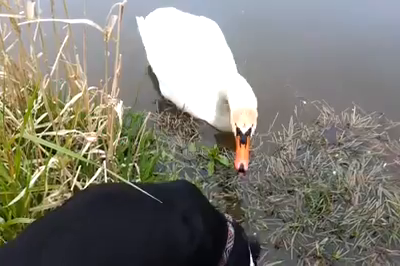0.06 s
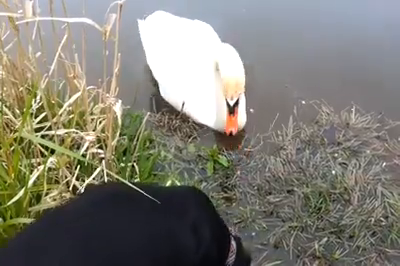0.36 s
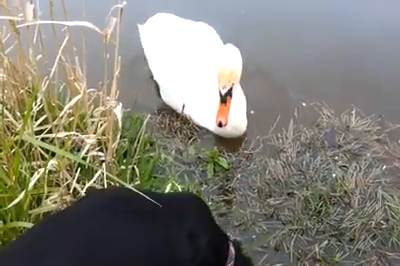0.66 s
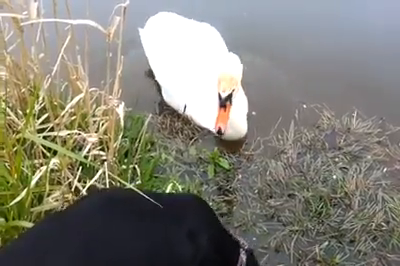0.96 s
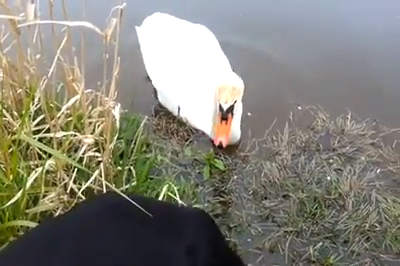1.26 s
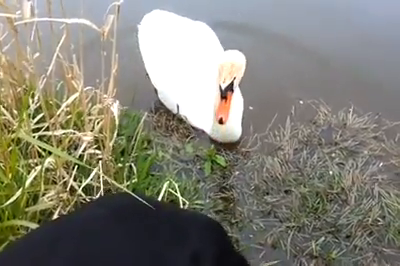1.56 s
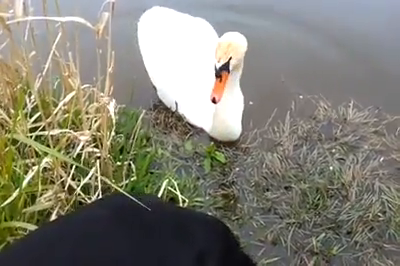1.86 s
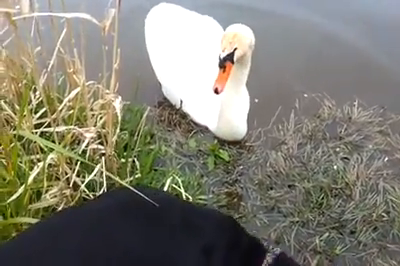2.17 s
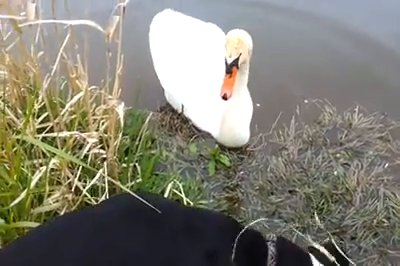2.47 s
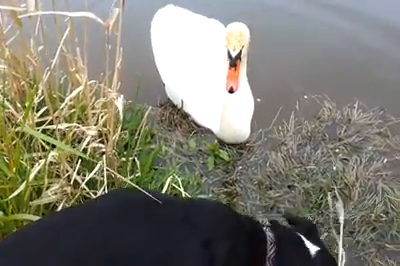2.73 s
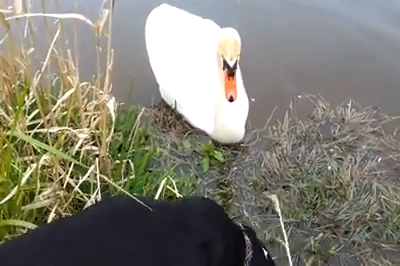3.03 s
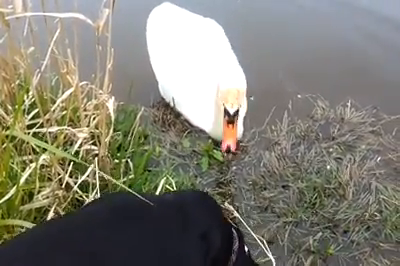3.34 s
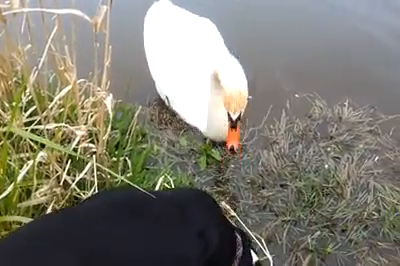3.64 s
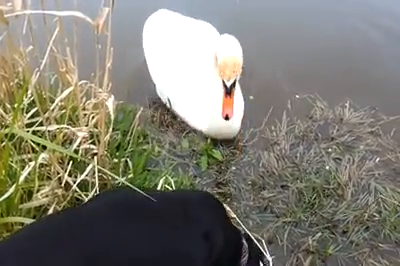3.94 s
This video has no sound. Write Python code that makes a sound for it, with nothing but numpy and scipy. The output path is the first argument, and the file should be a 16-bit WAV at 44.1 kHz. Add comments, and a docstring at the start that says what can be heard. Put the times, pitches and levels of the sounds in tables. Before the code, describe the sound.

A swan hisses for the first second, a breathy, fluttering rush with a faint hum, fading into a sputter. From about 1 to 2.3 seconds reeds rustle, dry stems tick and shallow water sloshes and plops, with a soft paw thud near 1.2 seconds. A few sparse ticks and plops follow over quiet open air. At about 3.6 seconds a second, softer hiss begins and lasts to the end.

```python
"""A pond's edge, heard from the bank through one small microphone. Out on the water a swan hisses twice
at a dog: air rushes through its throat and open bill, fluttering, while its long windpipe hums faintly
and the water mirrors the sound as the head moves. Between the hisses the reeds rustle, dry stems tick,
a paw falls softly and the shallows slosh and plop. Quiet open air lies under it all."""
import sys
import numpy as np
from scipy import signal
from scipy.fft import rfft, irfft, next_fast_len
from scipy.io import wavfile
from scipy.ndimage import uniform_filter1d, map_coordinates

SR = 44100
rng = np.random.default_rng(int(sys.argv[2]) if len(sys.argv) > 2 else 0)


def generate_wav(signal):
    """Clip the signal to [-1, 1] and save it as 16-bit WAV at the path in sys.argv[1]."""
    frames = np.transpose(np.atleast_2d(signal))
    scaled = np.clip(frames, -1, 1) * 32767
    pcm = np.round(scaled).astype(np.int16)
    wavfile.write(sys.argv[1], SR, pcm)


N = 176400


def amp(db):
    """Decibels to gain."""
    return 10 ** (np.asarray(db) / 20)


def unit(x):
    """Scale to rms 1."""
    return x / np.sqrt(np.mean(x ** 2) + 1e-20)


def along(points, hz):
    """Read (frequency, value) points at hz, on a log axis."""
    freqs, values = np.transpose(points)
    return np.interp(np.log(hz + 1), np.log(freqs + 1), values)


def curves(rows, t=np.arange(N) / SR):
    """Each column after the time, read at times t."""
    times, *columns = np.transpose(rows)
    return [np.interp(t, times, column) for column in columns]


def wobble(rate):
    """A smooth random curve, rate knots a second."""
    return map_coordinates(rng.standard_normal(int(N * rate / SR) + 4), [np.arange(N) * rate / SR])


def phase_of(hz):
    """Running phase of a changing frequency."""
    return 2 * np.pi * np.cumsum(hz) / SR


def filtered(x, response):
    """Shape x by a gain that depends on frequency."""
    size = next_fast_len(N + SR // 2)
    return irfft(rfft(x, size) * response(np.fft.rfftfreq(size, 1 / SR)), size)[:N]


def coloured(x, spectrum):
    """Shape x by (frequency, level) points, rms 1."""
    return unit(filtered(x, lambda hz: amp(along(spectrum, hz))))


def rush(spectrum):
    """Coloured noise, rms 1."""
    return coloured(rng.standard_normal(N), spectrum)


def grains(spectrum, per_s, spread_db, share):
    """Tiny random impacts on a bed of noise, rms 1."""
    hits = (rng.random(N) < per_s / SR) * rng.choice([-1, 1], N)
    strength = amp(spread_db * np.clip(rng.standard_normal(N), -2, 2))
    return unit(share * coloured(hits * strength, spectrum) + rush(spectrum))


def swells(rows):
    """Envelope of rounded swells, each with its own rise and fall."""
    power, t = np.zeros(N), np.arange(N) / SR
    for peak_s, rise_s, fall_s, db in rows:
        width_s = np.where(t < peak_s, rise_s, fall_s)
        power += (amp(db) * np.exp(-((t - peak_s) / width_s) ** 2)) ** 2
    return np.sqrt(power)


def add(track, start_s, sound):
    """Mix a short sound into the track."""
    part = track[round(start_s * SR):][:len(sound)]
    part += sound[:len(part)]


# Open air all around the microphone: freq_hz, level_db
AMBIENCE_SPECTRUM = [(20, -13), (210, -3), (651, -12.5), (950, -14), (6140, -18.5), (7080, -20),
                     (9200, -32)]

def pond_air(level_db=-54.5):
    """A low, quiet wash whose level drifts slightly."""
    return amp(level_db + 0.912 * wobble(7.598)) * rush(AMBIENCE_SPECTRUM)


# Swell of a wavelet in the weeds: peak_s, rise_s, fall_s, level_db
WAVELET_SWELL = [(1.9, .1, .14, -57.5)]
# Its falling gurgle: time_s, pitch_hz
GURGLE_PITCH = [(1.82, 900), (1.98, 520)]

def wavelet(width_hz=520):
    """A soft band of bubbling that sinks in pitch as the water drains back."""
    phase = phase_of(curves(GURGLE_PITCH)[0])
    bubbling = wobble(width_hz) * np.cos(phase) + wobble(width_hz) * np.sin(phase)
    return swells(WAVELET_SWELL) * unit(bubbling)


# Sloshes along the bank: peak_s, rise_s, fall_s, level_db
SLOSH_SWELLS = [(1.009, 0.0174, 0.00564, -41.5), (1.15, 0.0665, 0.056, -51), (1.212, 0.0363, 0.0216, -40.5),
                (1.29, 0.08, 0.137, -49.5), (1.9, 0.224, 0.35, -54), (3.05, 0.0275, 0.119, -62.5)]
# Colour of splashing water: freq_hz, level_db
WATER_SPECTRUM = [(50, -3.5), (120, -8.5), (300, 1), (550, -0.5), (1100, -2), (1700, -11), (3000, -30.5)]

def shallows():
    """Shallow water, pushed about, sloshes in grainy swells."""
    return swells(SLOSH_SWELLS) * grains(WATER_SPECTRUM, per_s=220, spread_db=2.5, share=1.12)


def paw_fall(peak_s=1.21, width_s=.018, level_db=-48, corner_hz=130):
    """One soft, low thud of a paw on the bank."""
    thud = unit(filtered(rng.standard_normal(N), lambda hz: hz / (1 + (hz / corner_hz) ** 4)))
    return swells([(peak_s, width_s, width_s, level_db)]) * thud


# Strokes through the reed bed: peak_s, rise_s, fall_s, level_db
REED_STROKES = [(1.245, 0.1125, 0.086, -46), (1.36, 0.0506, 0.06, -47), (1.65, 0.0983, 0.049, -50.5),
                (1.92, 0.4, 0.23, -52), (2.11, 0.144, 0.2135, -48), (2.21, 0.062, 0.019, -50),
                (3.408, 0.01, 0.00935, -52)]
# Colour of the rustle: freq_hz, level_db
REED_SPECTRUM = [(530, -28), (1140, -5), (1810, -8), (5810, 1.5), (7080, -4.5), (9200, -17.5)]

def reeds():
    """Brushed reeds crackle with many tiny snaps."""
    return swells(REED_STROKES) * grains(REED_SPECTRUM, per_s=450, spread_db=4, share=.6)


# Bubbles in the shallows: start_s, peak_db, pitch_hz
BUBBLES = [(1.136, -44, 1300), (1.206, -35.5, 743), (1.216, -32, 977), (1.266, -33, 650), (3.028, -41, 760),
           (3.047, -43, 900), (3.2994, -29.5, 900)]

def plops(t60_s=0.0026, onset_s=0.00103, splash_share=.17, splash_t60_s=0.0293):
    """Each plop is a quickly damped bubble with a soft start, and a little splash."""
    out, t = np.zeros(N), np.arange(SR // 20) / SR
    for start_s, db, hz in BUBBLES:
        bubble = (1 - np.exp(-t / onset_s)) * amp(-60 * t / t60_s) * np.sin(2 * np.pi * hz * t)
        splash = splash_share * amp(-60 * t / splash_t60_s) * rush(WATER_SPECTRUM)[:len(t)]
        add(out, start_s, amp(db) * (bubble / np.abs(bubble).max() + splash))
    return out


# Dry stems ticking on the bank: start_s, peak_db, tilt_db_per_octave
STEM_TICKS = [(1.043, -40, 4.5), (1.2327, -31, 7), (1.238, -29.5, 6), (1.3, -32, 4.5), (1.333, -32, 4),
              (2.537, -36.5, -0.5), (3.2296, -30, -3), (3.3376, -31, 2.5)]
# Modes of a stem: pitch_hz, level_db, t60_s
STEM_MODES = [(1834, 5.7, 0.0122), (3026, -3, 0.012), (4150, 6, 0.027), (5820, 3.3, 0.0082)]
# Colour of its crack: freq_hz, level_db
CRACK_SPECTRUM = [(400, -18.5), (1500, 3), (6200, -2), (7200, -20.5), (9000, -17.5)]

def stems(crack_t60_s=.011):
    """Each tick is a short crack and a few damped modes; thinner stems sound brighter."""
    out, t = np.zeros(N), np.arange(SR // 20) / SR
    for start_s, db, tilt in STEM_TICKS:
        bright_db = lambda hz: tilt * np.log2(hz / STEM_MODES[0][0])
        ring = sum(amp(level + bright_db(hz) - 60 * t / t60_s) * np.sin(2 * np.pi * hz * t)
                   for hz, level, t60_s in STEM_MODES)
        noise = rush([(hz, level + bright_db(hz)) for hz, level in CRACK_SPECTRUM])[:len(t)]
        tick = unit(ring) + unit(amp(-60 * t / crack_t60_s) * noise)
        add(out, start_s, amp(db) * tick / np.abs(tick).max())
    return out


# Hum of the swan's neck, its level relative to the hiss: time_s, lower_hz, upper_hz, level_db
WINDPIPE_HUM = [(0, 172, 402, -15), (.18, 198, 452, -13.5), (.3, 178.7, 395, -22.5),
                (.5, 261.8, 345.1, -19.5), (.95, 239.2, 303, -17), (3.65, 197.3, 278.5, -25.5),
                (3.7, 195.3, 284.8, -9.5), (4, 200.4, 292.4, -18)]

def windpipe(waver=.04, flicker_db=2, wobbles_per_s=70, upper_db=2):
    """Two narrow, gliding resonances of the long neck, blown unsteadily by the air."""
    def tone(hz):
        phase = phase_of(hz * (1 + waver * wobble(wobbles_per_s)))
        return np.sin(phase) * amp(flicker_db * wobble(wobbles_per_s))

    lower_hz, upper_hz, db = curves(WINDPIPE_HUM)
    return amp(db) * unit(tone(lower_hz) + amp(upper_db) * tone(upper_hz))


# Resonances of throat and bill, with the bill wide, narrow, and in the second hiss:
# wide_hz, narrow_hz, second_hz, width_hz, wide_db, narrow_db, second_db
THROAT_RESONANCES = [(700, 740, 743, 240, -6, -7, -2.5), (1092, 1039, 1060, 96, -0.5, -7, -1.5),
                     (1888, 2226, 2040, 250, -4, -3.5, -3), (2600, 2668, 2502, 200, -2, 0.5, 2),
                     (3264, 3430, 3362, 154.5, -1.5, -6, 1.5), (3839, 3715, 3920, 160, 3, 0, 3),
                     (4470, 4442, 4800, 228, -1.5, 1, -1), (5044, 5517, 5460, 130, -1, 1, 0),
                     (5590, 5920, 5896, 204, 9, 2.5, -0.5), (6217, 6172, 6193, 189.5, 1.5, 4, 6.5)]
# The bill in the first hiss: time_s, narrowing (0 wide, 1 narrow)
BILL_NARROWING = [(.15, 0), (.35, 0.646), (.85, 0.944)]
# Sharp resonance at the bill's edge: time_s, pitch_hz, level_db
BILL_EDGE = [(.12, 3960, -19), (.23, 4346, 4.5), (.34, 3960, -7.5), (.58, 4126, -7.5), (.72, 3960, 8.5),
             (.93, 3745, 6), (.99, 3590, -8.5)]
# Broad rush of breath: freq_hz, level_db
BREATH_SPECTRUM = [(80, -46), (200, -5), (600, -12), (1400, -11.5), (2500, -10), (3050, -17), (4700, -5),
                   (6500, -6), (7100, -11.5), (7800, -19)]
# Rise and fall of one treble band: time_s, gain_db
TREBLE_GAIN = [(0, -1), (.25, -5.5), (.66, 3.5), (.93, -2.5), (3.63, -9), (3.72, -1.5)]

def throat(edge_width_ratio=.038, treble_hz=5720, treble_width_hz=750, eddy_db=3):
    """Turbulence through resonances that slide as the bill narrows."""
    frames = dict(nperseg=1024, noverlap=768)
    hz, t, turbulence = signal.stft(rng.standard_normal(N), SR, **frames)
    hz = hz[:, None]
    resonance = lambda centre, width, db: amp(db) ** 2 / (1 + ((hz - centre) / width) ** 2) ** 2
    narrowing = curves(BILL_NARROWING, t)[0]
    in_first = t < SECOND_HISS[0][0]
    power = amp(along(BREATH_SPECTRUM, hz)) ** 2
    for wide_hz, narrow_hz, second_hz, width_hz, wide_db, narrow_db, second_db in THROAT_RESONANCES:
        centre_hz = np.where(in_first, wide_hz + (narrow_hz - wide_hz) * narrowing, second_hz)
        db = np.where(in_first, wide_db + (narrow_db - wide_db) * narrowing, second_db)
        power = power + resonance(centre_hz, width_hz, db)
    edge_hz, edge_db = curves(BILL_EDGE, t)
    power += resonance(edge_hz, edge_width_ratio * edge_hz, edge_db)
    treble_band = np.exp(-((hz - treble_hz) / treble_width_hz) ** 2)
    gain = np.sqrt(power) * amp(curves(TREBLE_GAIN, t)[0] * treble_band)
    gain /= np.sqrt(np.mean(gain ** 2, axis=0))  # the colour moves, the level holds
    # Eddies: passing whistly patches in the air stream
    eddies = uniform_filter1d(rng.standard_normal(turbulence.shape), size=3, axis=0)
    eddies = unit(uniform_filter1d(eddies, size=12, axis=1))
    _, hiss = signal.istft(turbulence * gain * amp(eddy_db * eddies), SR, **frames)
    return unit(hiss[:N])


# The head above the water: time_s, posture (0 lunging, about 1 drawn back)
HEAD_POSTURE = [(.12, 0.017), (.22, 0.35), (.3, 1.16), (.42, 1.324), (.58, 1.115), (.9, 0.647), (3.63, .6),
                (3.72, 1.182), (4, 0.981)]

def with_water_reflection(hiss, lunging_ms=1.6005, back_ms=0.9985, share=.4, cutoff_hz=3300):
    """A duller copy takes the longer way off the water; its lag sweeps notches as the head moves."""
    lag_ms = lunging_ms + (back_ms - lunging_ms) * curves(HEAD_POSTURE)[0]
    dull = filtered(hiss, lambda hz: 1 / (1 + (hz / cutoff_hz) ** 4))
    reflection = map_coordinates(dull, [np.arange(N) - lag_ms * SR / 1000])
    return hiss + share * reflection


# Force of each hiss, heard from the bank: time_s, level_db
FIRST_HISS = [(0, -28), (.13, -27.5), (.225, -25.5), (.34, -29.5), (.56, -31.5), (.72, -30), (.945, -35.5),
              (.98, -44), (1.01, -43.5), (1.022, -54.5)]
SECOND_HISS = [(3.585, -59.5), (3.62, -46.5), (3.655, -37.5), (3.675, -41), (3.72, -37), (3.85, -34),
               (4, -35)]
# Flutter of the airway: time_s, rate_hz
FLUTTER_RATE = [(.45, 140), (.6, 108), (.86, 112), (1.02, 55), (3.6, 85), (3.8, 112)]

def swan(flutter_depth=.33, jitter=.08, sputter_hz=100):
    """Two hisses pulsed by the fluttering airway, over the windpipe's hum."""
    t = np.arange(N) / SR
    effort = sum(amp(curves(rows)[0]) * (t >= rows[0][0]) * (t <= rows[-1][0])
                 for rows in (FIRST_HISS, SECOND_HISS))
    rate_hz = curves(FLUTTER_RATE)[0] * (1 + jitter * wobble(60))
    depth = flutter_depth * np.maximum(1, sputter_hz / rate_hz)  # slow flutter deepens into a sputter
    pulses = np.exp(depth * np.cos(phase_of(rate_hz)))
    flutter = unit(pulses * amp(0.57 * wobble(70)))
    hiss = unit(with_water_reflection(throat() * flutter))
    return effort * (hiss + windpipe())


def scene():
    """The quiet air, the swan and the small sounds of the bank, in mono."""
    return (pond_air() + swan() + reeds() + shallows() + paw_fall() + wavelet() + stems() + plops())[None]


# Response of the microphone on the bank: freq_hz, gain_db
MIC_RESPONSE = [(6900, 0.5), (7350, -7.5), (8050, -24), (9000, -5.5), (9800, -14)]

def record(dry):
    """A small microphone whose treble falls away steeply."""
    top_hz = 10000
    return filtered(dry[0], lambda hz: amp(along(MIC_RESPONSE, hz)) * (hz < top_hz))[None]


dry = scene()
out = record(dry)
generate_wav(out)
```